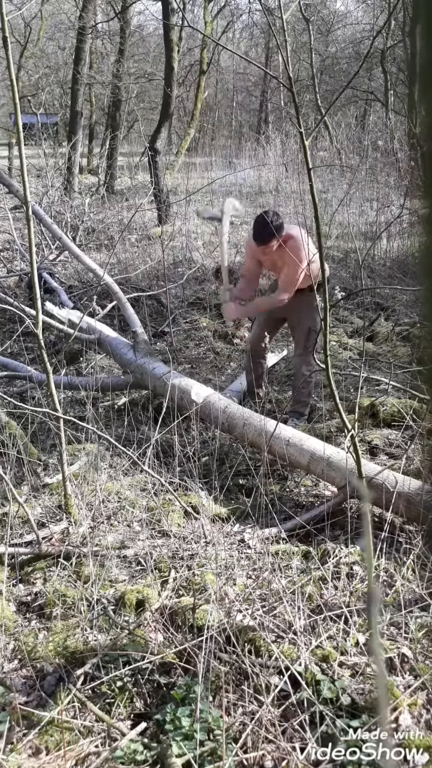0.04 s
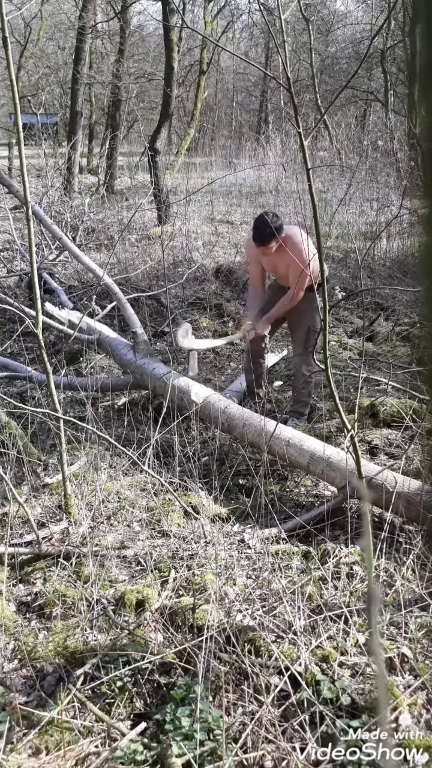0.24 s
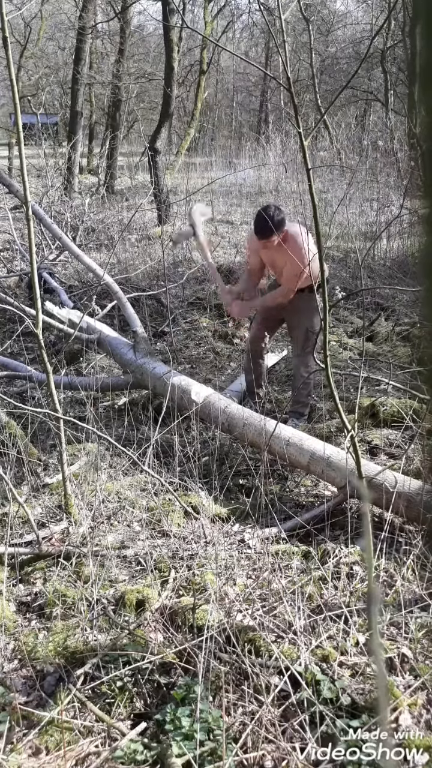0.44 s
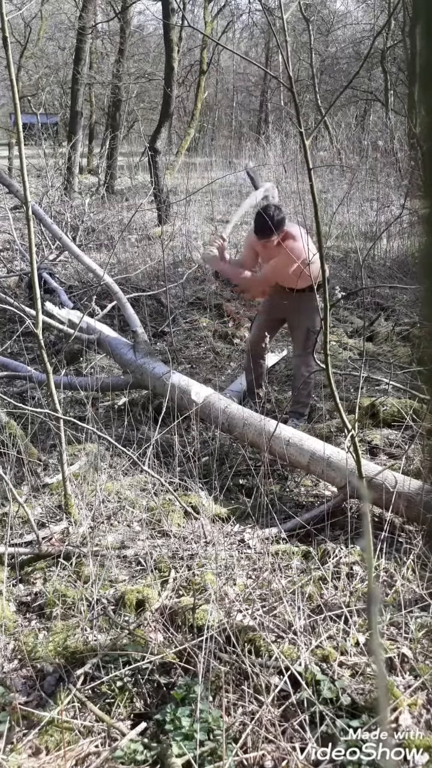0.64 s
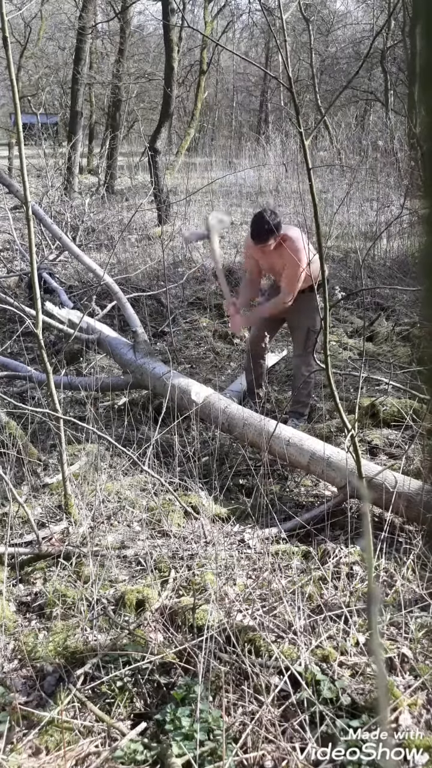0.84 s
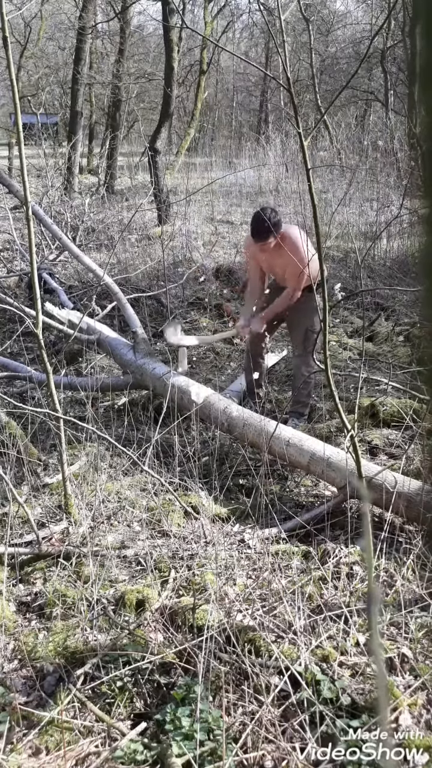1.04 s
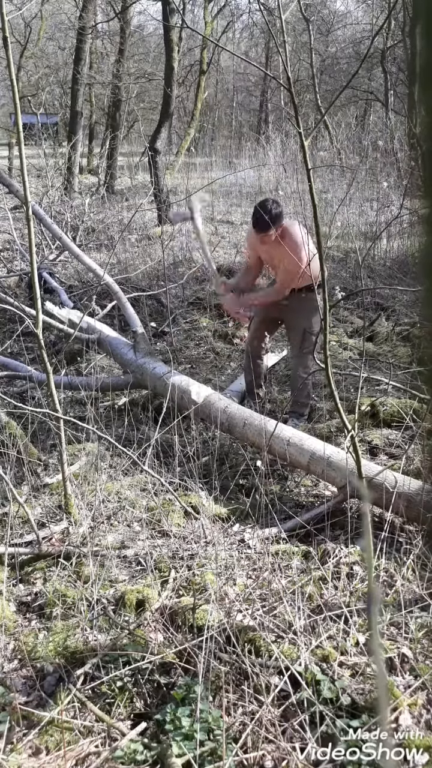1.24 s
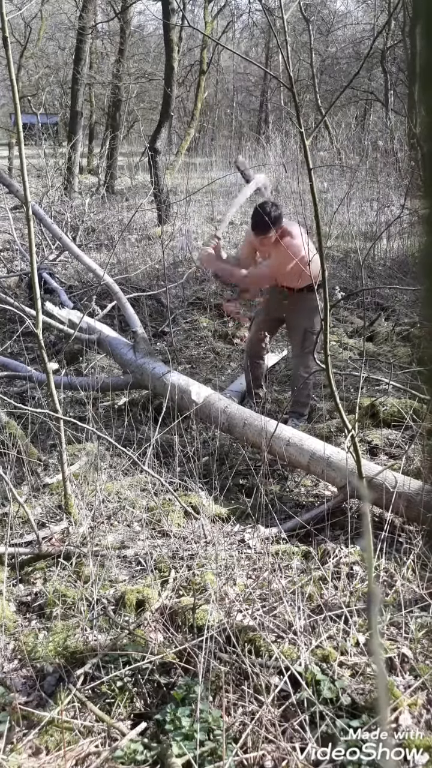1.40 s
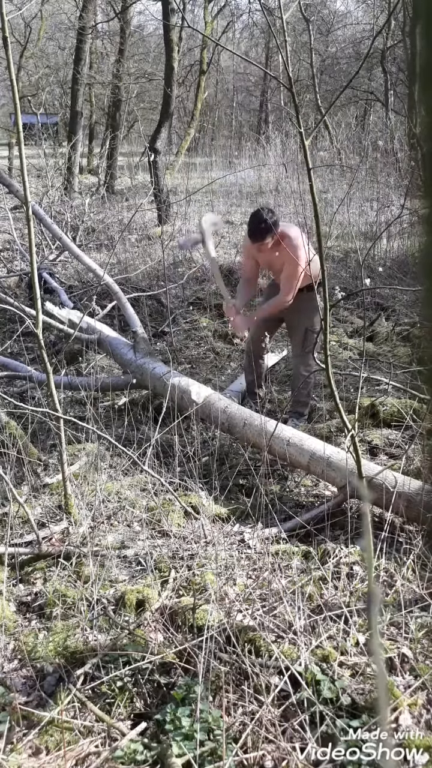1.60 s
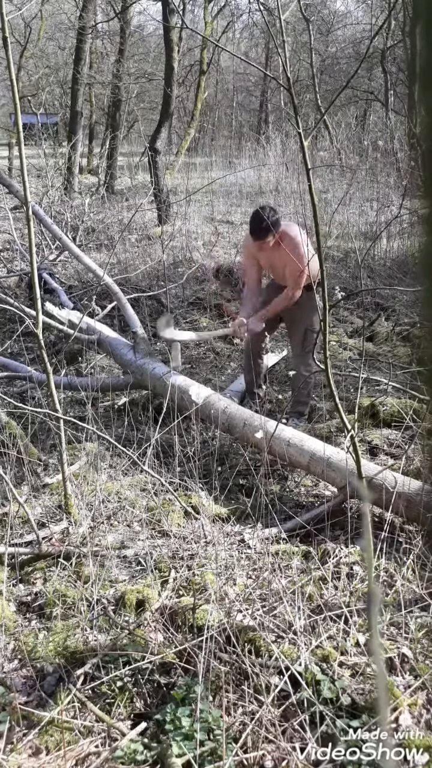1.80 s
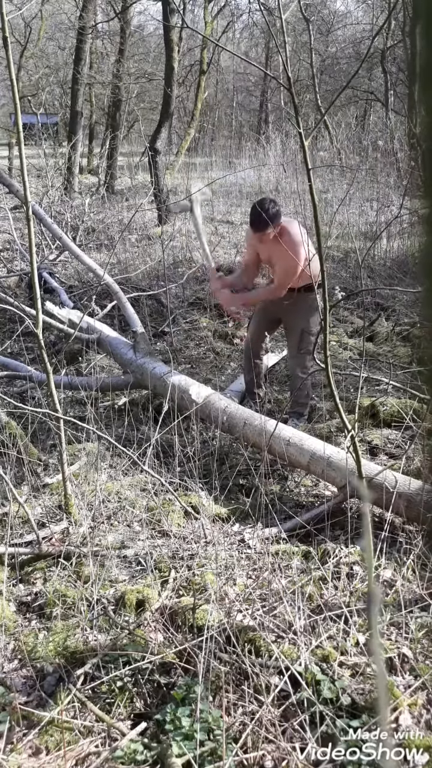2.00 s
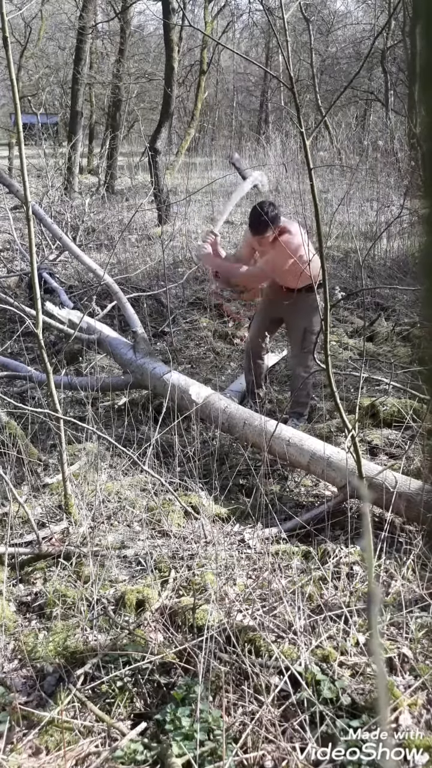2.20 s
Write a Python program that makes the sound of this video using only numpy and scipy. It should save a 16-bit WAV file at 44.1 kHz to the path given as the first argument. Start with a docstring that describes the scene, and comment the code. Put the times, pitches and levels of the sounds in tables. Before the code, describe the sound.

Three steady axe chops hit a log, each a splintering knock with a low thud and a short woodland echo. Heard from several metres away, chips land and dry twigs snap softly between and after the strokes.

```python
"""An axe bites three times into a fallen trunk, some metres off in a quiet, bare wood.
Each chop splits fibres, knocks the wood and rings the axe head; the trunk flexes with a low boom.
The trees scatter the blows; ground and large trunks return low echoes.
Between blows chips land and dry brush rustles, over a faint far-off rumble and one small bird."""
import sys
import numpy as np
from scipy import signal
from scipy.fft import rfft, irfft
from scipy.io import wavfile

SR = 44100
rng = np.random.default_rng(int(sys.argv[2]) if len(sys.argv) > 2 else 0)


def int16_out(signal):
    """Quantize to a 16-bit WAV file."""
    q = np.round(np.clip(np.atleast_2d(signal).T, -1, 1) * 32767)
    wavfile.write(sys.argv[1], SR, q.astype(np.int16))


N = 103635

# far-off rumble and air: f/Hz, density/dB
AIR_SPECTRUM = [(25, -10.5), (60, -6), (110, 2.5), (170, 2.5), (330, -0.5), (700, -3.5), (1300, -7.5),
                (2200, -17.5), (4500, -16), (8300, -22.5), (10000, -31), (13000, -20.5), (16000, -26.5)]
# dry brush underfoot: centre t/s, Gaussian sigma/s, level/dB, centre f/Hz
RUSTLES = [(0.464, 0.027, -81, 4420), (1.19, 0.011, -59.5, 11000), (1.29, 0.021, -62.5, 9050),
           (1.40, 0.011, -64, 6000), (1.453, 0.017, -57, 5200), (1.576, 0.026, -56, 5560),
           (1.937, 0.0087, -66, 11800), (2.077, 0.014, -46, 4460), (2.135, 0.016, -55, 9050),
           (2.277, 0.067, -68.5, 3934)]
# chips landing, twigs snapping: t/s, level/dB, centre f/Hz
SNAPS = [(0.4653, -39, 3910), (0.4935, -44.5, 1790), (0.7517, -60, 6000), (0.9517, -55, 1778),
         (0.952, -63, 6950), (1.3643, -54.5, 2850), (1.4561, -43, 3180), (1.5045, -53, 5420),
         (1.9639, -51, 5150), (2.0264, -54.5, 7000), (2.1081, -31, 5480), (2.119, -46, 4520),
         (2.1999, -49.5, 8300), (2.2892, -45.5, 6500)]
# scatter among the trees: f/Hz, early level/dB, late level/dB, late t60/s
SCATTER_BANDS = [(51, 5.5, -11.5, 0.56), (125, 16.5, 6.5, .6), (280, 11, 6.5, 1), (600, 12, 2.5, 1.0),
                 (1396, 14, 5.5, 1), (2200, 7, -2.5, 0.97), (3030, 12, 6, .72), (5400, 6, -4.5, 0.82),
                 (8840, 3.5, -12.5, 0.94), (9700, -7.5, -30, 0.17), (15000, -16, -33, 0.28)]
# echoes off ground and large trunks: lag/s, level/dB
ECHOES = [(.045, -30.5), (0.121, -36), (0.137, -25), (0.206, -36.5)]
# trunk bending modes: f/Hz, level/dB, t60/s
TRUNK_MODES = [(112, -23, 0.18), (186.3, 4, 0.047), (285, 3, 0.028)]
# modes of the wood round the notch: f/Hz, level/dB, t60/s
NOTCH_MODES = [(172, -12.5, 0.1), (271.5, -3.5, .045), (330, 1, 0.051), (454, -9, 0.016),
               (544, -8.5, 0.076), (628.7, -8, 0.093), (779.5, -3.5, 0.049), (931, -4.5, 0.042),
               (1056, -9.5, 0.058), (1174.4, -6, 0.042), (1573, -17, 0.13), (1876, -7, 0.041)]
# axe head modes, damped by the cut: f/Hz, level/dB, t60/s
AXE_MODES = [(2602, -8.5, 0.064), (2833, 2, 0.02), (3580, -0.5, 0.023), (4480, -12.5, 0.073),
             (5116, -5, 0.038), (5450, -14, 0.038), (5910, -9.5, 0.035), (6763, -6, 0.017),
             (7730, -7.5, 0.049), (8030, -11, 0.049), (8270, -6, 0.044)]
# splitting fibres: f/Hz, density/dB
FIBRE_SPECTRUM = [(70, -33.5), (170, -11), (400, 4.5), (1000, -0.5), (1500, -5.5), (2300, -7.5), (3200, -8),
                  (5500, -9.5), (8500, -15), (9800, -21), (14000, -21.5), (16000, -31.5)]
# colour points of the spot struck: f/Hz
SPOT_HZ = [350, 570, 1150, 2900, 5500]
# blows: t/s, level/dB, boom gain/dB, scatter gain/dB, ring f/Hz, gain/dB at each of SPOT_HZ
CHOPS = [(0.2241, -0.23, -3, 0.32, 5500, 2.5, -9.5, 2.5, -2, 1.5),
         (0.9933, -0.17, -5.5, -1.2, 3400, 2.5, -1, -9.5, 3.5, -2),
         (1.7558, -1, 3, 1, 3490, -3, 2.5, -2, -1, 1)]
# stereo side filter: f/Hz, gain/dB
SIDE_RESPONSE = [(30, -22), (90, -30.5), (250, -41), (600, -32.5), (1500, -35), (4000, -26), (8000, -21.5),
                 (13000, -16.5)]


def undb(db):
    """Decibels to gain."""
    return 10 ** (np.asarray(db) / 20)


def unit(x):
    """Scale to rms 1."""
    return x / np.sqrt(np.mean(x ** 2))


def clock(length_s=None):
    """Sample times in s; whole scene by default."""
    return np.arange(N if length_s is None else int(length_s * SR)) / SR


def through(x, response):
    """Convolve, keep length."""
    return signal.fftconvolve(x, response)[:len(x)]


def delay(x, at_s):
    """Place x in the scene."""
    return np.concatenate([np.zeros(int(at_s * SR)), x, np.zeros(N)])[:N]


def colour(x, points, size=4096):
    """Minimum-phase filter through (f/Hz, gain/dB) points."""
    hz, db = np.array(points, float).T
    curve_db = np.interp(np.log(np.fft.rfftfreq(size, 1 / SR) + 1), np.log(hz), db)
    cepstrum = irfft(np.log(undb(curve_db)))
    cepstrum[1:size // 2] *= 2
    cepstrum[size // 2 + 1:] = 0
    return through(x, irfft(np.exp(rfft(cepstrum))))


def band(x, centre_hz, width_hz):
    """Band-pass round a geometric centre."""
    low_hz = np.hypot(centre_hz, width_hz / 2) - width_hz / 2
    high_hz = min(low_hz + width_hz, SR / 2 - 1000)
    return signal.sosfilt(signal.butter(2, [low_hz, high_hz], "band", fs=SR, output="sos"), x)


def fade(t60_s):
    """Exponential decay, 1 s long."""
    return np.exp(-np.minimum(np.log(1000) * clock(1) / t60_s, 100))


def ring(modes, twist=0):
    """Damped sines; twist spreads their phases."""
    t = clock(1)
    return sum(undb(db) * fade(t60_s) * np.sin(2 * np.pi * hz * t + twist * np.pi * k ** 2 / len(modes))
               for k, (hz, db, t60_s) in enumerate(modes))


def crackle(grain, size=SR):
    """Noise, rms 1; spikier as grain rises."""
    return unit(rng.standard_normal(size) * np.exp(grain * rng.standard_normal(size)))


def air(level_db=-63, wander_db=.4):
    """Far-off rumble and air; level drifts slightly."""
    wander = np.interp(clock(), np.linspace(0, N / SR, 10), rng.standard_normal(10))
    return unit(colour(rng.standard_normal(N), AIR_SPECTRUM)) * undb(level_db + wander_db * wander)


def bird(at_s=.887, sigma_s=.022, pitch_hz=3770, level_db=-68.5):
    """One thin, distant call, smeared by the trees to narrow-band noise."""
    swell = np.exp(-((clock() - at_s) / sigma_s) ** 2 / 2)
    return undb(level_db) * swell * unit(band(rng.standard_normal(N), pitch_hz, width_hz=180))


def brush():
    """Dry stalks and leaves: swells of fine crackle."""
    out = 0
    for at_s, sigma_s, db, hz in RUSTLES:
        swell = np.exp(-((clock() - at_s) / sigma_s) ** 2 / 2)
        out += undb(db) * swell * unit(band(crackle(grain=.5, size=N), hz, width_hz=1.4 * hz))
    return out


def twigs(decay_s=.0035):
    """Chips land, twigs snap: sharp ticks of dry wood."""
    envelope = np.exp(-clock(1) / decay_s)
    envelope_rms = np.sqrt(np.mean(envelope ** 2))
    out = 0
    for at_s, db, hz in SNAPS:
        snap = band(envelope * crackle(grain=.7), hz, width_hz=.7 * hz)
        out += delay(undb(db) * envelope_rms * unit(snap), at_s)
    return out


def woodland(early_t60_s=.29, rise_s=.0027):
    """Impulse response of the trees: dense scatter from near trunks, longer wash from far ones."""
    spectrum = rfft(crackle(grain=.4))
    log_hz = np.log(np.fft.rfftfreq(SR, 1 / SR) + 1)
    log_centres = np.log([row[0] for row in SCATTER_BANDS])
    out = 0
    for pick, (_, early_db, late_db, late_t60_s) in zip(np.eye(len(SCATTER_BANDS)), SCATTER_BANDS):
        band_noise = irfft(spectrum * np.interp(log_hz, log_centres, pick))
        early, late = (tail / np.linalg.norm(tail) for tail in (fade(early_t60_s), fade(late_t60_s)))
        out += band_noise * np.hypot(undb(early_db) * early, undb(late_db) * late)
    return out * (1 - np.exp(-clock(1) / rise_s))


def echoes(blows):
    """Ground and large trunks return the low band."""
    lows = band(blows, centre_hz=297, width_hz=131)
    return sum(undb(db) * delay(lows, lag_s) for lag_s, db in ECHOES)


def boom(gain_db=-10.5, rise_s=.003):
    """The whole trunk flexes once the blow has run along it."""
    onset = 1 - np.exp(-(clock(1) / rise_s) ** 2)
    return undb(gain_db) * onset * ring(TRUNK_MODES)


def spot(x, spot_db, share=1):
    """Colour set by where the blade lands."""
    points = zip(SPOT_HZ, share * np.array(spot_db))
    return colour(x, [(SPOT_HZ[0] / 2, 0), *points, (SPOT_HZ[-1] * 2, 0)])


def knock(ring_hz, wood_db=-10, steel_db=-15, boost_db=7, width_oct=.4):
    """Notch wood and axe head ring; steel modes boosted near ring_hz."""
    steel = [(hz, db + boost_db * np.exp(-(np.log2(hz / ring_hz) / width_oct) ** 2), t60_s)
             for hz, db, t60_s in AXE_MODES]
    return undb(wood_db) * ring(NOTCH_MODES, twist=1) + undb(steel_db) * ring(steel, twist=.94)


def chop(body, rise_s=.0009, bite_s=.0094, splinter_s=.0037, splinter_db=-9, fibre_db=-12):
    """The blade drives in: a burst of splitting fibres over the ringing body."""
    t = clock(1)
    push = 1 - np.exp(-t / rise_s)
    bite = np.exp(-(t / bite_s) ** 2) + undb(splinter_db) * np.exp(-t / splinter_s)
    fibres = undb(fibre_db) * unit(colour(crackle(grain=.22), FIBRE_SPECTRUM))
    return push * (fibres * bite + body)


def stereo(mid, spread_s=.002, hiss_db=-79.5):
    """Near mono: the side is a faint smeared copy plus hiss."""
    smear = rng.standard_normal(SR) * np.exp(-clock(1) / spread_s)
    side = colour(through(mid, smear / np.linalg.norm(smear)), SIDE_RESPONSE)
    side += undb(hiss_db) * rng.standard_normal(N)
    return np.array([mid + side, mid - side])


def scene(boom_lag_s=.0185, body_wet_db=-31, small_wet_db=-18):
    """Three chops with scatter and echoes, over small sounds and air."""
    blows, scatter = 0, 0
    for at_s, db, boom_db, scatter_db, ring_hz, *spot_db in CHOPS:
        body = knock(ring_hz)
        wash = woodland() + undb(body_wet_db) * through(body, woodland())
        strike = delay(spot(chop(body), spot_db), at_s)
        flex = undb(boom_db) * delay(boom(), at_s + boom_lag_s)
        blows += undb(db) * (strike + flex)
        scatter += undb(db + scatter_db) * delay(spot(wash, spot_db, share=.5), at_s)
    small = twigs() + brush() + bird()
    scatter += undb(small_wet_db) * through(small, woodland())
    return stereo(blows + scatter + echoes(blows) + small + air())


def record(dry, low_cut_hz=68, top_hz=15900):
    """High-pass, soft clip, steep low-pass."""
    thin = signal.sosfilt(signal.butter(2, low_cut_hz, "high", fs=SR, output="sos"), dry)
    rounded = thin / (1 + thin ** 6) ** (1 / 6)
    return signal.sosfilt(signal.ellip(8, .2, 70, top_hz, fs=SR, output="sos"), rounded)


dry = scene()
out = record(dry)
int16_out(out)
```